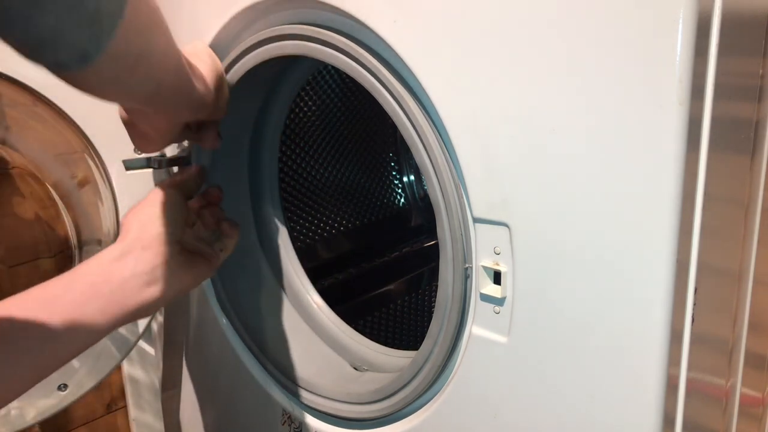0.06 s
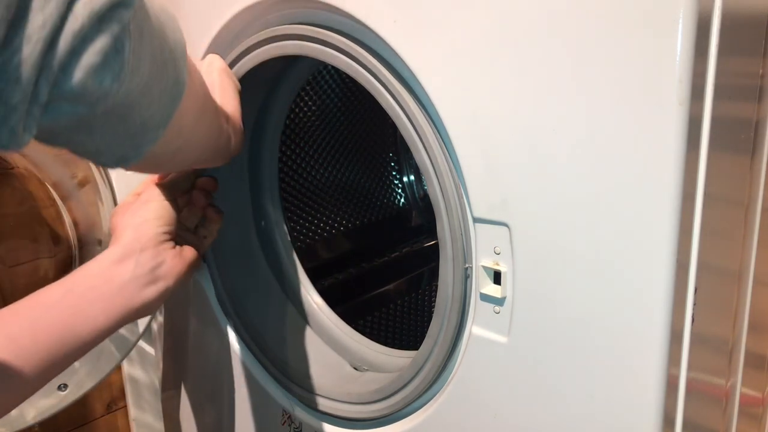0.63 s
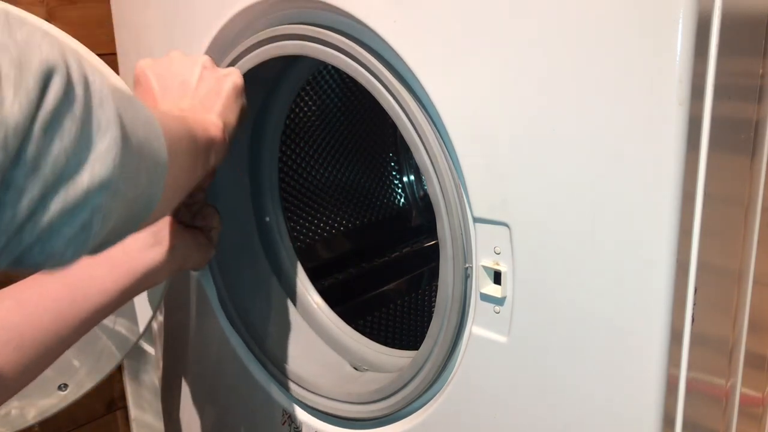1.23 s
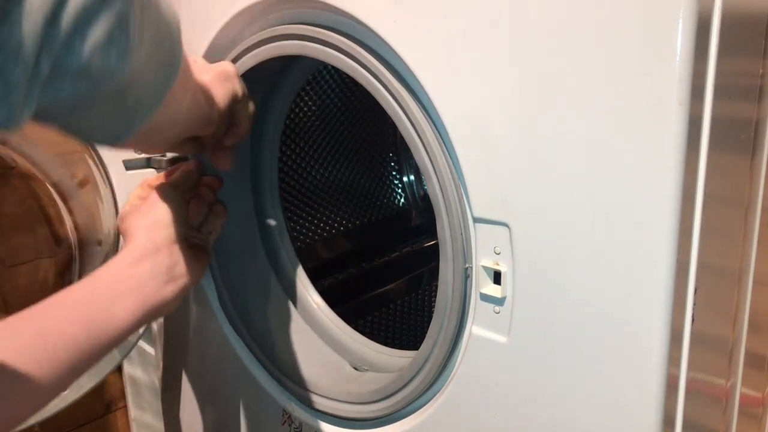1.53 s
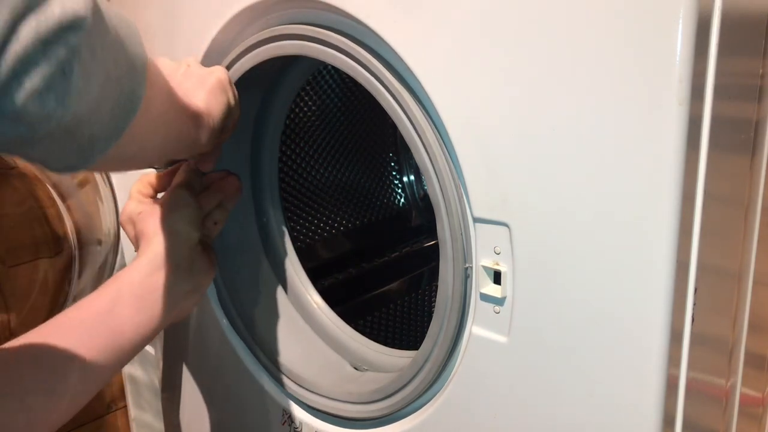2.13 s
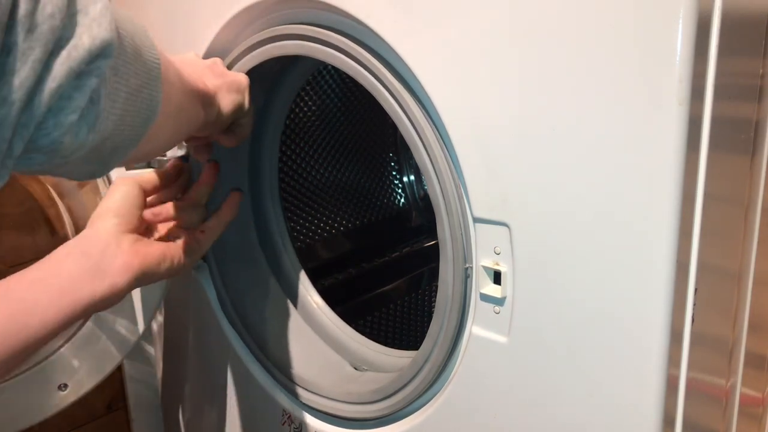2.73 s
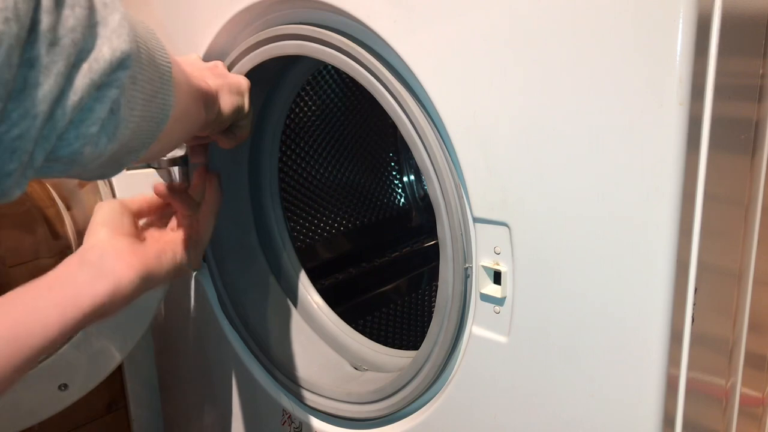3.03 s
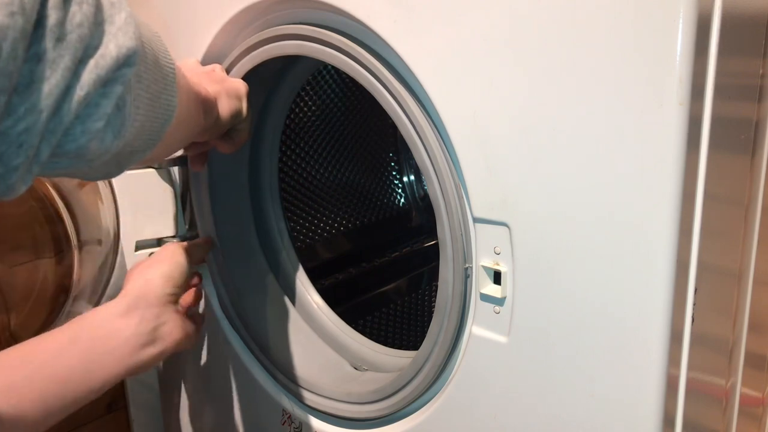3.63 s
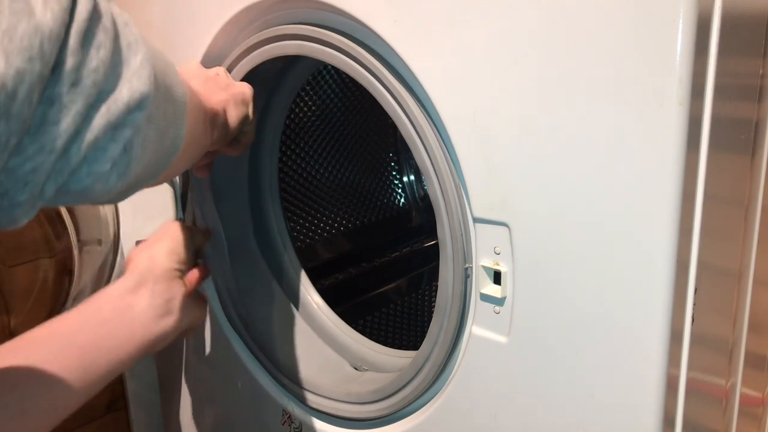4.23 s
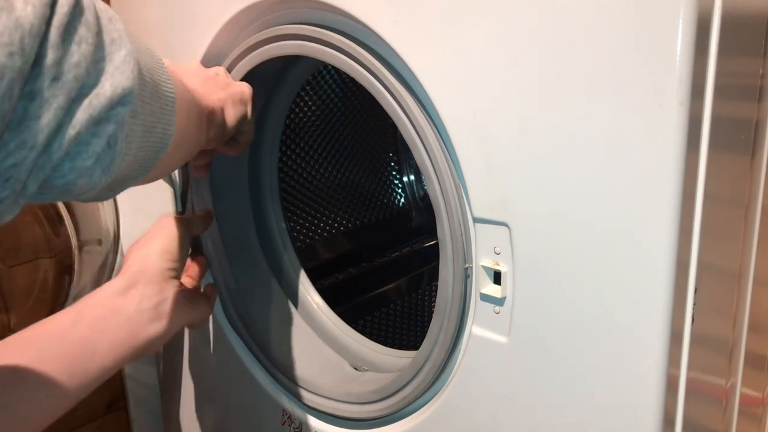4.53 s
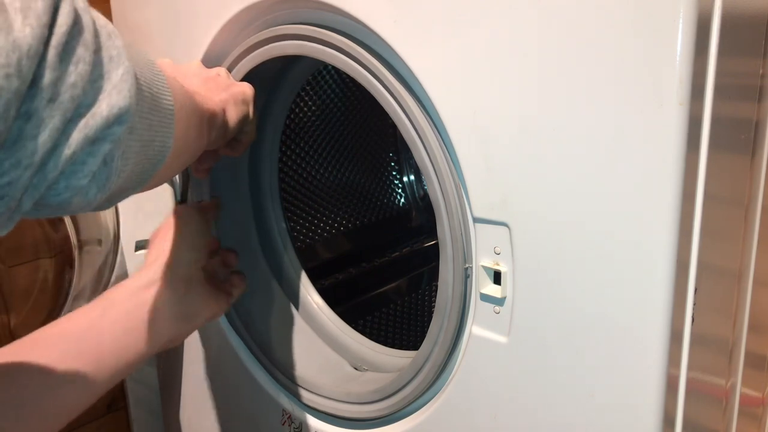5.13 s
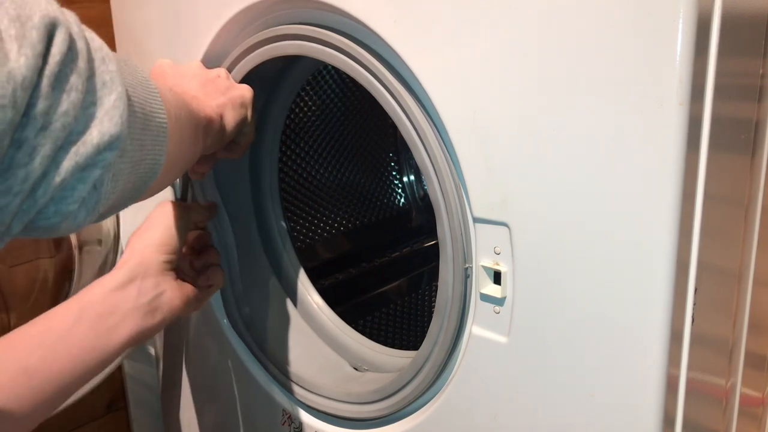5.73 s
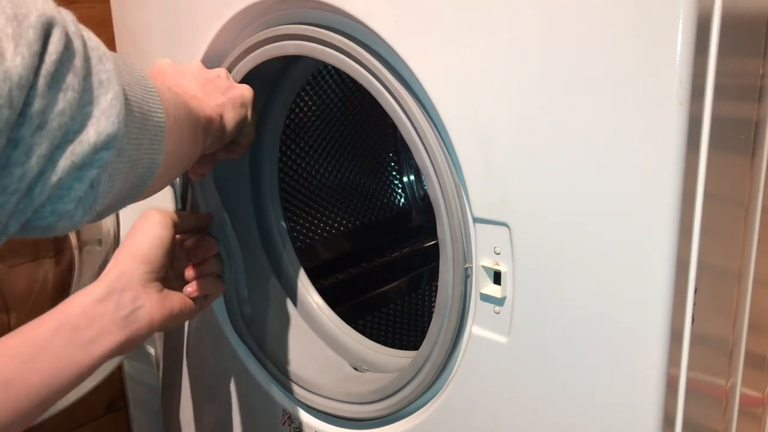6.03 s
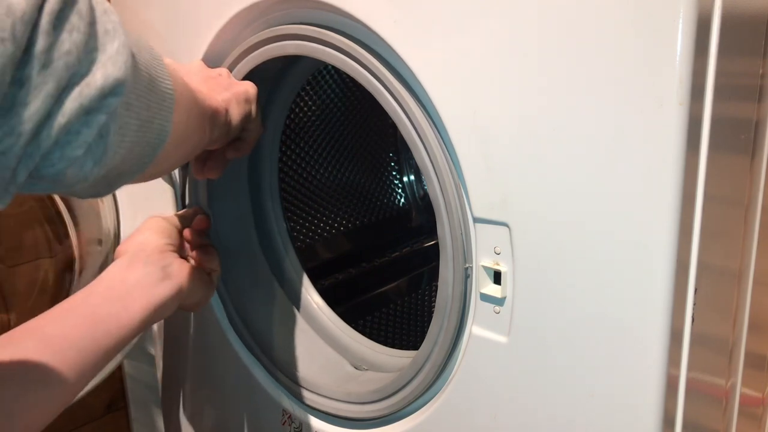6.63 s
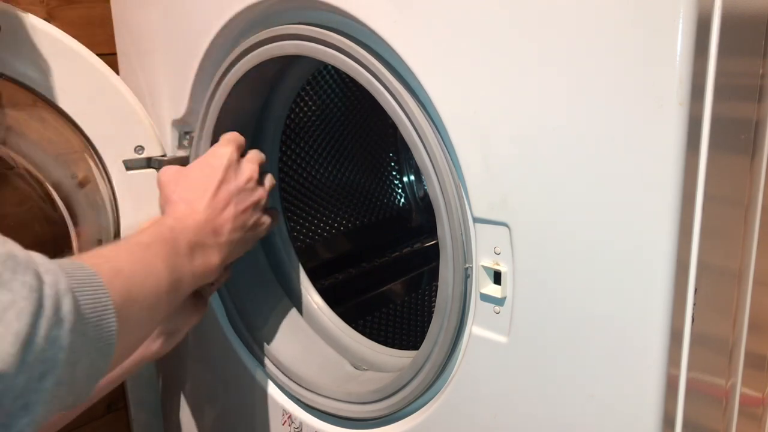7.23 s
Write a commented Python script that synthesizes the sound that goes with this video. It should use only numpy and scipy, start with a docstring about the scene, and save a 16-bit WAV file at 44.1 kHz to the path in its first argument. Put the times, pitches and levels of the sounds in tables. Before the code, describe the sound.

Hands work a rubber door seal onto a washing machine's rim, heard from nearby in a small quiet room. For the first two seconds there are faint fingertip scuffs and light, scattered snaps of rubber against steel. From about 2 seconds the open door's hinge ticks, and a firmer snap lands at 2.5. Around 2.8 to 3 seconds the door shudders and the hinge gives a quick cluster of clacks with a slight metallic ring. The seal flops into its groove with a deep, soft thump at 4.4 seconds and two more at 4.9 and 5, each booming briefly through the cabinet. Small snaps and scuffs follow around 6 seconds, then one sharp, loud snap at 6.8. Throughout, skin and sleeve rub softly over a faint low cabinet drone and room hum.

```python
"""A small quiet room, where two hands work a rubber door seal onto the rim of a washing machine.
The seal's lip snaps against the steel front and flops into the groove with soft, booming thumps.
Fingertips scuff the sticky rubber. An arm nudges the open door, which shudders and clacks in its hinge.
Underneath, skin and sleeve rub, the cabinet drones under the hands and the room hums faintly."""
import sys
import numpy as np
from scipy import signal
from scipy.fft import rfft, irfft, next_fast_len
from scipy.io import wavfile
from scipy.ndimage import map_coordinates

SR = 44100
rng = np.random.default_rng(int(sys.argv[2]) if len(sys.argv) > 2 else 0)


def materialize(psi):
    """Save the field psi as 16-bit PCM at rate SR to the path in sys.argv[1].

    A 1-D psi becomes a single channel; in a 2-D psi each row is a channel.
    """
    bounded = np.clip(np.atleast_2d(psi).T, -1, 1)
    quanta = np.round(bounded * 32767).astype(np.int16)
    wavfile.write(sys.argv[1], SR, quanta)


N = 320607
TIME = np.arange(N) / SR
AGE = np.arange(SR * 3 // 4) / SR  # seconds into a single hit

# Tone of a knock, a crack and the cabinet's crowded modes. Each row: frequency in Hz, level in dB.
KNOCK_SPECTRUM = [(100, -29.5), (300, 3.5), (600, -0.5), (1500, -4.5), (2200, -7.5), (3500, -9),
                  (6000, -19), (16000, -71)]
CRACK_SPECTRUM = [(500, -39), (2000, -17.5), (3500, -3), (5500, 1.5), (7200, -0.5), (9000, 1),
                  (10500, -4.5), (12000, -0.5), (16000, -4)]
THUD_SPECTRUM = [(60, -21), (190, -9), (280, -2.5), (390, -21), (560, 2), (750, -2.5), (950, -23),
                 (1400, -30), (2500, -17.5), (8000, -38)]
# The rim's resonances. Each row: centre in Hz, width in Hz, gain in dB.
RIM_PEAKS = [(557, 66, -6.5), (834.5, 140, 8), (1062, 180, 7), (1320, 90, -2.5), (1740, 370, 4),
             (2510, 40, 2.5)]
# The sheet-steel cabinet's boom. Each row: pitch in Hz, level in dB, t60 in seconds.
CABINET_MODES = [(78, -27, 0.28), (105.8, 2, 0.32), (165.4, -3.5, 0.34), (190.4, 0, 0.23),
                 (256.8, 4.5, 0.2), (340.7, -12, 0.23), (513, -3, 0.1), (602, -11.5, 0.28),
                 (639, -8.5, 0.24), (707, -12.5, 0.21), (790, -15, 0.22), (997, -8.5, 0.18),
                 (1910, -9, 0.11)]
# The lip hits the rim. Each row: start in seconds, level in dB, crack offset in dB,
# cabinet offset in dB, pitch of the struck spot in Hz.
LIP_SNAPS = [(0.199, -46.5, -10, 0, 1070), (0.539, -53.5, 11.5, -24, 1670), (1.268, -43.5, -0.5, -25, 760),
             (1.539, -34.5, -10, -8.5, 1054), (2.31, -36, -3.5, -5, 725), (2.323, -42, 9, -3, 875),
             (2.454, -26.5, -7, -9.5, 1176), (3.518, -53, -1.5, -10, 1030), (3.599, -38.5, -2.5, -25, 840),
             (4.298, -52.5, -20, -21, 1020), (4.326, -37, -2.5, -14, 1235), (4.852, -39.5, -3.5, -4, 845),
             (5.009, -40, -1.5, -12, 1020), (5.019, -37, -8.5, -25, 1814), (5.674, -55.5, 1, -13, 880),
             (5.884, -47.5, -9, -26, 895), (6.101, -49.5, -5, -17, 1020), (6.146, -38.5, -9, -24, 4440),
             (6.148, -36.5, -16, -31, 910), (6.176, -38, -15, -23, 2740), (6.264, -43.5, -9, -34, 926),
             (6.519, -53, 2, -23, 1010), (6.83, -17.5, -3.5, -7, 1940), (7.068, -52.5, -20, -6, 1060)]


def lip_snaps():
    """The lip peels and slaps the rim: a crack and a knock, then the cabinet's slower thud and boom."""
    out = np.zeros(N)
    crack_peaks = [(4080, 910, 3.5), (6760, 310, 1), (13600, 2400, -9)]
    for start, db, crack_db, cabinet_db, hz in LIP_SNAPS:
        knock = amp(-3) * colour(burst(t60=0.031, attack=0.00076), KNOCK_SPECTRUM, RIM_PEAKS)
        spot = amp(-2.5) * fade(t60=0.029) * np.sin(2 * np.pi * hz * AGE)
        crack = amp(crack_db) * colour(burst(t60=0.02, attack=0.0009), CRACK_SPECTRUM, crack_peaks)
        thud = amp(-4) * colour(burst(t60=0.11, attack=0.0057), THUD_SPECTRUM)
        boom = ring(CABINET_MODES, attack=0.022, scatter_db=1)
        peel_db = -53.5 + 0.79 * (db + 38)  # harder snaps peel louder; -38 dB is a typical snap
        lead_in = peel(rise=0.013, rasp_db=peel_db, fizz_db=peel_db - 17.5, hz=930)
        place(out, start - 0.007, lead_in, wet_db=-4)
        place(out, start, amp(db) * (knock + crack), wet_db=-4.5)
        place(out, start, amp(db) * spot, wet_db=-11)
        place(out, start, amp(db + cabinet_db) * (thud + boom), wet_db=-15.5)
    return out


# The rubber drops into the groove. Each row: start in seconds, level in dB, settled pitch in Hz.
SEAL_FLOPS = [(0.628, -48, 86.2), (0.765, -52, 169), (1.033, -50, 157), (1.045, -49, 76.2),
              (1.408, -48.5, 154), (1.566, -42, 164), (2.319, -36.5, 284), (2.611, -33.5, 165),
              (2.632, -35.5, 90.6), (2.812, -41, 79.4), (4.054, -38, 92.2), (4.362, -15, 79),
              (4.435, -33, 78), (4.859, -17.5, 83.4), (5.035, -20, 80.8), (5.273, -43, 82.3),
              (5.634, -40, 91), (5.902, -39, 82), (6.152, -39, 89), (6.596, -50.5, 97.4)]


def seal_flops():
    """The lip lets go, then the whole fold turns over lower and slower; the front panel booms on."""
    out = np.zeros(N)
    rise_s = 0.027
    panel_modes = [(52.6, -13.5, 0.59), (79.2, 3.5, 0.19), (112.3, -11.5, 0.53)]
    for start, db, hz in SEAL_FLOPS:
        pitch = hz * (1 + 0.68 * np.exp(-AGE / 0.012))  # the fold slackens as it turns
        phase = 2 * np.pi * np.cumsum(pitch) / SR
        fold = swell(rise_s, sharpness=5.1) * np.sin(phase)
        lip = amp(-9) * swell(0.31 * rise_s, sharpness=1.3) * np.sin(1.43 * phase)
        grains = slips(len(AGE), rate=1500, spread_db=0)
        rumble = colour(grains, DRONE_SPECTRUM, [(168, 170, 6.9), (660, 580, 3.3)])
        flutter = amp(-12) * swell(0.69 * rise_s, sharpness=0.96) * rumble
        panel = ring(panel_modes, attack=0.037, scatter_db=1, phase_scatter=0.5)
        place(out, start, amp(db) * (fold + lip + flutter + panel), wet_db=-16.5)
    return out


# The hinge's resonances. Each row: centre in Hz, width in Hz, gain in dB.
HINGE_PEAKS = [(590, 55, 2.3), (1130, 170, 4.5), (1620, 1400, 10.4), (1930, 33, 1.7), (3090, 64, 2.7)]
# The steel pin, and the door's frame and bowl. Each row: pitch in Hz, level in dB, t60 in seconds.
PIN_MODES = [(2958, -1, .65), (5421, -10, .4), (6772, -7, .2), (1783, 1, .45), (2609, -5, .2)]
DOOR_MODES = [(70.36, -4.5, 0.77), (103, 9, 0.22), (182.3, -2, 0.49), (208, -15, 0.028), (296, -8, 0.35),
              (358, -11, 0.28), (458, -7, 0.32), (603, -3.5, 0.16)]
# The hinge takes up its play. Each row: start in seconds, level in dB.
HINGE_CLACKS = [(1.501, -44.5), (1.908, -45.5), (1.964, -40), (2.012, -43), (2.081, -48), (2.177, -42),
                (2.23, -38), (2.282, -37), (2.736, -40), (2.809, -28.5), (2.814, -26.5), (2.871, -23.5),
                (2.951, -29.5), (3.086, -40), (4.611, -40)]


def hinge_clacks():
    """The hinge knocks and its pin rings; a harder clack is brighter, with a smaller share of frame."""
    out = np.zeros(N)
    plastic_modes = [(1180, -2, 0.011), (1642, 8, 0.027), (1740, -10, 0.022)]
    crack_peaks = [(6470, 1100, 14), (4370, 710, 15)]
    for start, db in HINGE_CLACKS:
        force_db = db + 38  # above a typical clack
        bright = amp(-32 + 0.78 * force_db)
        knock = amp(-5) * colour(burst(t60=0.03, attack=0.00037), KNOCK_SPECTRUM, HINGE_PEAKS)
        plastic = amp(-12.5) * ring(plastic_modes, attack=0.0012, scatter_db=2)
        crack = bright * colour(burst(t60=0.12, attack=0.0021), CRACK_SPECTRUM, crack_peaks)
        pin = amp(-8) * bright * ring(PIN_MODES, attack=0.001, scatter_db=1)
        frame = amp(-18.5 - 0.32 * force_db) * ring(DOOR_MODES, attack=0.0076, scatter_db=7.5)
        place(out, start, amp(db) * (knock + crack), wet_db=-1.5)
        place(out, start, amp(db) * (plastic + pin + frame), wet_db=-10)
    return out


# Tone of the shaking door. Each row: frequency in Hz, level in dB.
SHUDDER_SPECTRUM = [(25, -47), (50, 11), (75, 1), (125, -5.5), (170, -16), (240, -6), (330, -13),
                    (450, -18.5), (900, -24.5), (4000, -50.5)]
# An arm bumps the door. Each row: start in seconds, level in dB, hold in seconds.
DOOR_NUDGES = [(1.952, -40, .02), (2.166, -40, 0.19), (2.799, -30.5, 0.031)]


def door_shudder():
    """Each nudge sets the open door shaking: a low judder that holds, then dies away."""
    attack_s, fall_db_per_s = 0.021, 104
    swing = np.zeros(N)
    for start, db, hold in DOOR_NUDGES:
        onset = np.clip((TIME - start) / attack_s, 0, 1)
        swing += onset * amp(db - fall_db_per_s * np.maximum(TIME - start - hold, 0))
    judder = slips(N, rate=300, spread_db=3)
    return swing * colour(judder, SHUDDER_SPECTRUM, [(358, 46, 11.6), (156.4, 5, 6.1)])


# Fingers catch on the seal. Each row: start in seconds, rise in seconds, rasp level in dB,
# fizz level in dB, centre of the rasp in Hz.
FINGER_SCUFFS = [(0.197, 0.0089, -50, -59, 294), (0.59, 0.013, -58.5, -66.5, 271),
                 (.742, 0.02, -52, -62.5, 292), (1.054, 0.0078, -56, -67, 1520),
                 (1.131, 0.014, -58, -74, 1400), (1.249, 0.02, -48.5, -66, 905),
                 (1.717, 0.0087, -52.5, -83, 480), (2.077, 0.019, -52.5, -90, 1500),
                 (2.606, 0.0073, -50.5, -59, 870), (2.726, 0.023, -51.5, -80, 1530),
                 (1.829, 0.0095, -62, -66, 1500), (3.589, 0.0097, -55.5, -55.5, 1000),
                 (5.149, .013, -60, -79, 1500), (4.016, 0.02, -53.5, -57, 740),
                 (4.317, 0.012, -52, -50.5, 1780), (4.349, 0.0078, -52, -47.5, 1800),
                 (4.358, 0.015, -40.5, -62, 640), (4.811, 0.011, -66, -63, 800),
                 (4.846, 0.01, -44, -54, 800), (5.111, 0.015, -59, -59, 1015),
                 (5.372, 0.022, -65.5, -64, 960), (5.806, 0.0068, -61, -88, 600),
                 (5.88, 0.0072, -53.5, -57, 1060), (6.112, 0.014, -56.5, -80, 1620),
                 (6.572, 0.013, -56, -79, 1030)]


def finger_scuffs():
    """Fingertips peel off the sticky rubber."""
    out = np.zeros(N)
    for start, rise, rasp_db, fizz_db, hz in FINGER_SCUFFS:
        place(out, start, peel(rise, rasp_db, fizz_db, hz), wet_db=-1.5)
    return out


# Tone of peeling rubber. Each row: frequency in Hz, level in dB.
RASP_SPECTRUM = [(80, 1), (250, 7.5), (600, 1.5), (1100, -2.5), (2000, -7), (3500, -7), (7000, -33.5),
                 (16000, -59)]


def peel(rise, rasp_db, fizz_db, hz):
    """A short shower of slips: a rasp pitched by the stretch of the rubber, and a fine fizz on top."""
    rasp_peaks = [(hz, 1.74 * hz, 8), (1050, 150, 3), (1850, 300, 4)]
    rasp = colour(slips(len(AGE), rate=900, spread_db=4), RASP_SPECTRUM, rasp_peaks)
    fizz = colour(slips(len(AGE), rate=1000, spread_db=5), CRACK_SPECTRUM, [(13200, 7100, 2.3)])
    return swell(rise, sharpness=1.69) * (amp(rasp_db) * rasp + amp(fizz_db) * fizz)


# A hand or sleeve slides to a new grip. Each row: start in seconds, length in seconds,
# rub level in dB, hiss level in dB.
HAND_STROKES = [(-.2, 0.35, -59.5, -73), (0.054, 0.76, -65.5, -85), (0.96, 0.81, -65, -78),
                (1.784, 1, -65.5, -75.5), (2.457, 0.82, -70.5, -81), (3.136, 0.21, -76.5, -71),
                (3.654, .26, -62, -64), (3.78, 0.25, -61, -84), (5, 0.32, -62, -77),
                (6.207, 0.64, -72.5, -85), (6.854, 0.89, -73, -79)]


def hand_rubbing():
    """Skin and sleeve slide on the rubber under uneven pressure, with sparse ticks of skin letting go."""
    rub_gain, hiss_gain = amp(-85), amp(-87.5)  # hands that only hold on
    edge_s = 0.13
    for start, length, rub_db, hiss_db in HAND_STROKES:
        speed = np.clip(np.minimum(TIME - start, start + length - TIME) / edge_s, 0, 1)
        rub_gain = rub_gain + amp(rub_db) * speed
        hiss_gain = hiss_gain + amp(hiss_db) * speed
    pressure = wobble(rate=29)
    rub = colour(slips(N, rate=1500, spread_db=2.5), KNOCK_SPECTRUM, [(872, 120, 5.4), (1340, 370, 4.3)])
    hiss = colour(slips(N, rate=2200, spread_db=5), CRACK_SPECTRUM, [(13500, 4000, 2), (10400, 910, -10)])
    ticks = amp(-11) * colour(slips(N, rate=14, spread_db=4), CRACK_SPECTRUM)
    return rub_gain * amp(0.59 * pressure) * rub + hiss_gain * (amp(1.3 * pressure) * hiss + ticks)


# The cabinet's low rumble. Each row: frequency in Hz, level in dB.
DRONE_SPECTRUM = [(25, 4), (50, 3.5), (85, 8.5), (125, -1), (165, 2), (210, -7.5), (270, -10.5), (420, -14),
                  (900, -31), (4000, -56)]


def cabinet_drone():
    """The cabinet drones while a hand leans on it, building up to each flop and easing off after it."""
    build_s, ease_s, lag_s = 0.04, 0.2, 0.02
    since_flops = [TIME - start - lag_s for start, _, _ in SEAL_FLOPS]
    press = np.max([np.exp(-np.maximum(t / ease_s, -t / build_s)) for t in since_flops], axis=0)
    gain = (amp(-59.5) + amp(-63) * press) * amp(1.6 * wobble(rate=12))
    return gain * colour(rng.standard_normal(N), DRONE_SPECTRUM, [(264, 23, 9.6), (163, 13, 2.6)])


# The room's noise bed. Each row: frequency in Hz, level in dB.
ROOM_SPECTRUM = [(25, -10.5), (60, -0.5), (100, 4.5), (160, -15), (250, -15), (500, -25), (1000, -19.5),
                 (2000, -24), (4000, -28), (8000, -33.5), (15000, -36.5)]


def room_tone():
    """Faint, steady noise, heaviest in the bass."""
    return amp(-61) * colour(rng.standard_normal(N), ROOM_SPECTRUM)


# The room's short reverb. Each row: frequency in Hz, t60 in seconds.
ROOM_DECAY = [(60, 0.87), (250, 0.37), (700, 0.3), (1900, 0.24), (5000, 0.15), (13000, 0.12)]


def place(track, start, sound, wet_db):
    """Lay a sound into the track with the room's diffuse tail, whose treble dies first."""
    hz, t, noise = signal.stft(rng.standard_normal(len(AGE)), SR, nperseg=256)
    decay = np.exp(-np.log(1000) * t / along(ROOM_DECAY, hz)[:, None])
    tail = signal.istft(noise * decay, SR, nperseg=256)[1][:len(AGE)]
    tail *= 1 - np.exp(-AGE / 0.00061)
    wet = signal.fftconvolve(sound, tail / np.linalg.norm(tail))[:len(sound)]
    slot = track[max(round(start * SR), 0):][:len(sound)]
    slot += (sound + amp(wet_db) * wet)[:len(slot)]


def burst(t60, attack):
    """The brief chatter of a contact, with a softened edge."""
    return np.sign(rng.standard_normal(len(AGE))) * fade(t60) * (1 - np.exp(-AGE / attack))


def ring(modes, attack, scatter_db, phase_scatter=np.pi):
    """Decaying modes (Hz, dB, t60 in seconds), struck with new strengths and phases each time."""
    chance = rng.standard_normal((len(modes), 2))
    tones = sum(amp(db + scatter_db * a) * fade(t60) * np.sin(2 * np.pi * hz * AGE + phase_scatter * b)
                for (hz, db, t60), (a, b) in zip(modes, chance))
    return tones * (1 - np.exp(-AGE / attack))


def slips(count, rate, spread_db):
    """Tiny stick-slip releases of uneven size, about rate a second, at rms 1."""
    hits = rng.random(count) < rate / SR
    sizes = amp(spread_db * np.clip(rng.standard_normal(count), -2, 2))
    clicks = hits * sizes * rng.choice([-1, 1], count)
    return clicks / np.sqrt(np.mean(clicks ** 2) + 1e-20)


def colour(x, spectrum, peaks=()):
    """Minimum-phase EQ of energy 1: a broad spectrum plus peaks (centre Hz, width Hz, dB)."""
    size = 2 ** 13
    hz = np.fft.rfftfreq(size, 1 / SR)
    peaks_db = sum(db / (1 + (2 * (hz - centre) / width) ** 2) for centre, width, db in peaks)
    cepstrum = irfft(np.log(amp(along(spectrum, hz) + peaks_db)))[:size // 2]
    response = irfft(np.exp(rfft(2 * cepstrum, size)))
    return signal.fftconvolve(x, response / np.linalg.norm(response))[:len(x)]


def fade(t60):
    """A free decay, 60 dB down after t60 seconds."""
    return np.exp(-np.log(1000) * AGE / t60)


def swell(rise, sharpness):
    """An envelope that climbs to 1 in rise seconds and relaxes."""
    return (AGE / rise * np.exp(1 - AGE / rise)) ** sharpness


def wobble(rate):
    """A smooth random curve, rate knots a second."""
    return map_coordinates(rng.standard_normal(int(N * rate / SR) + 4), [TIME * rate])


def along(points, hz):
    """(Hz, value) points read on a log frequency axis."""
    knots_hz, values = np.transpose(points)
    return np.interp(np.log(hz + 1), np.log(knots_hz + 1), values)


def amp(db):
    """Decibels to gain."""
    return 10 ** (np.asarray(db) / 20)


def scene():
    """The mono mix: seal, door and hands over the drone and the room tone."""
    foreground = lip_snaps() + seal_flops() + hinge_clacks() + door_shudder() + finger_scuffs()
    return (foreground + hand_rubbing() + cabinet_drone() + room_tone())[None]


def record(dry):
    """The microphone loses the deepest bass and keeps nothing above its band limit."""
    low_cut_hz, top_hz = 42, 15900
    size = next_fast_len(N + SR)
    hz = np.fft.rfftfreq(size, 1 / SR)
    thinned = signal.sosfilt(signal.butter(3, low_cut_hz, "highpass", fs=SR, output="sos"), dry)
    return irfft(rfft(thinned, size) * (hz < top_hz), size)[:, :N]


dry = scene()
out = record(dry)
materialize(out)
```